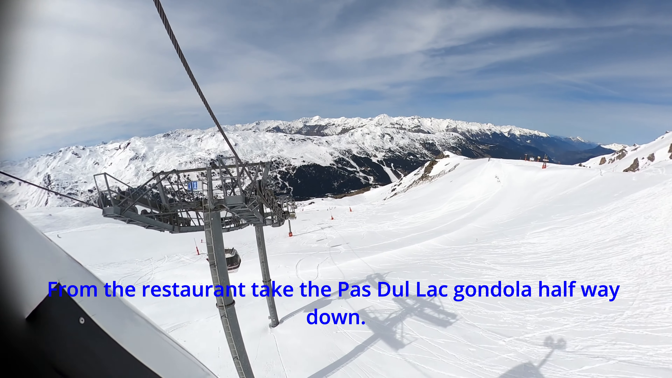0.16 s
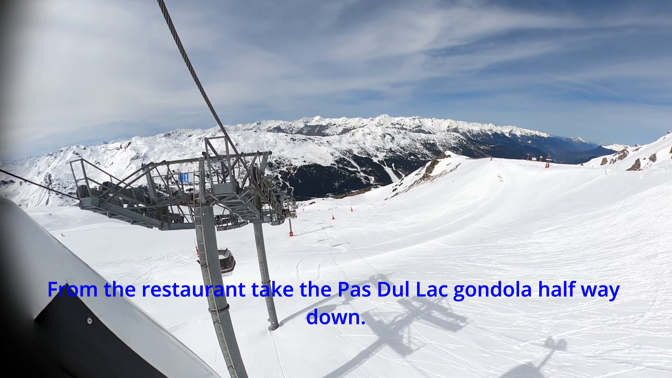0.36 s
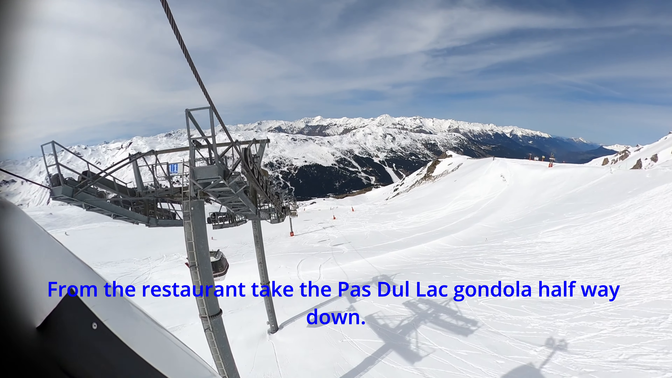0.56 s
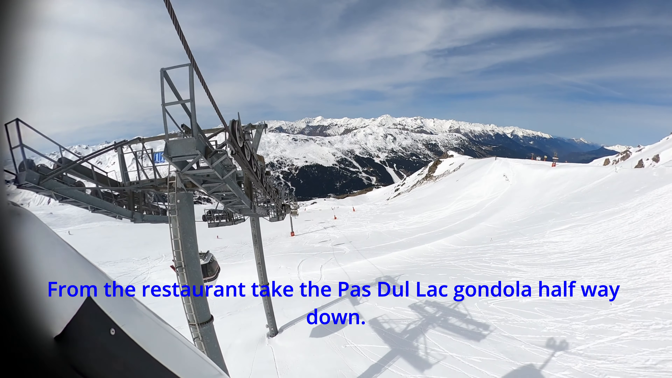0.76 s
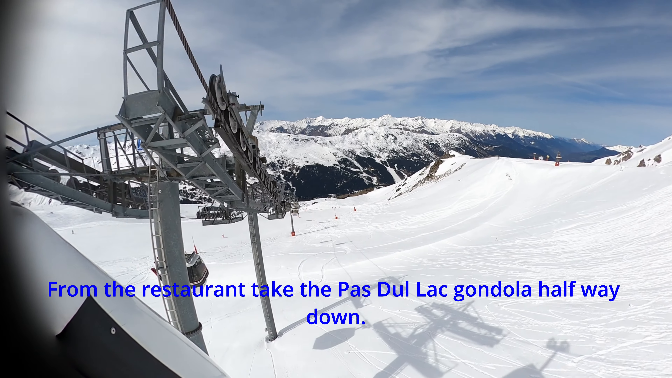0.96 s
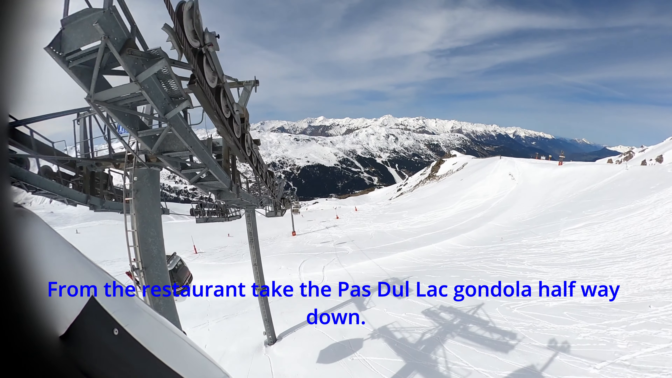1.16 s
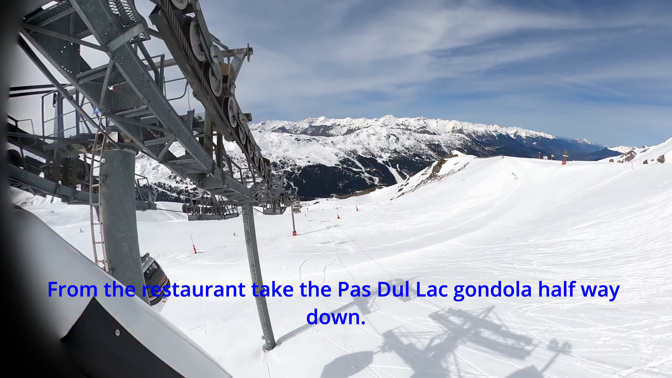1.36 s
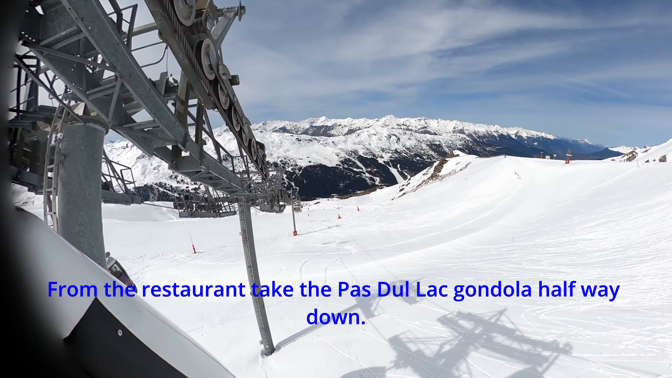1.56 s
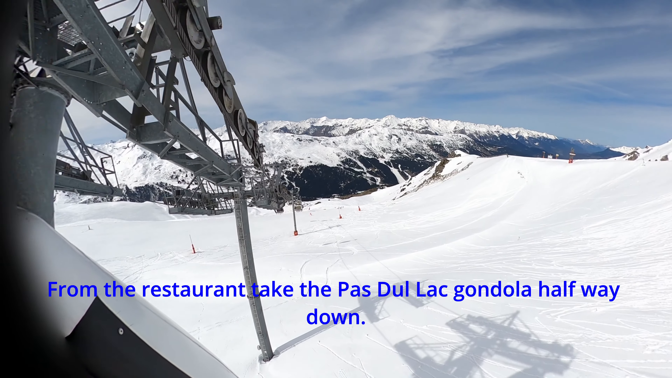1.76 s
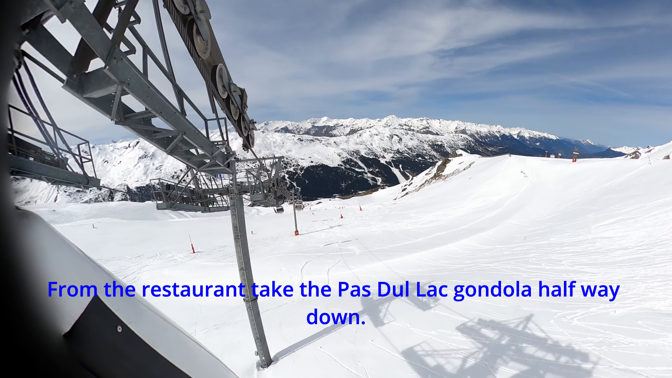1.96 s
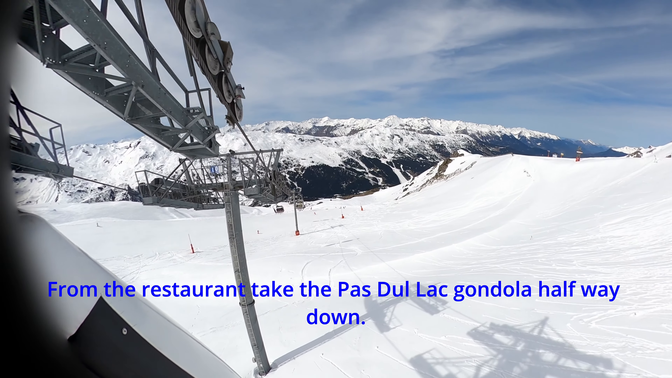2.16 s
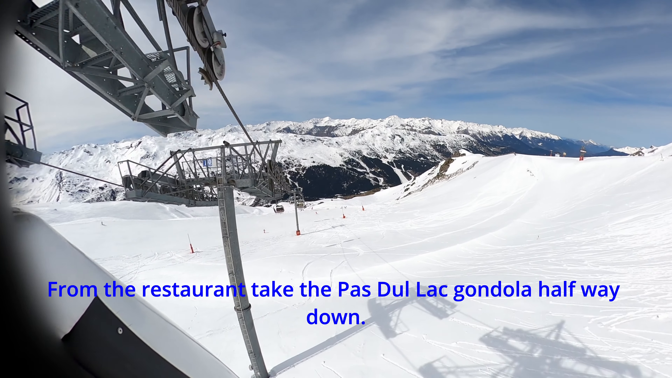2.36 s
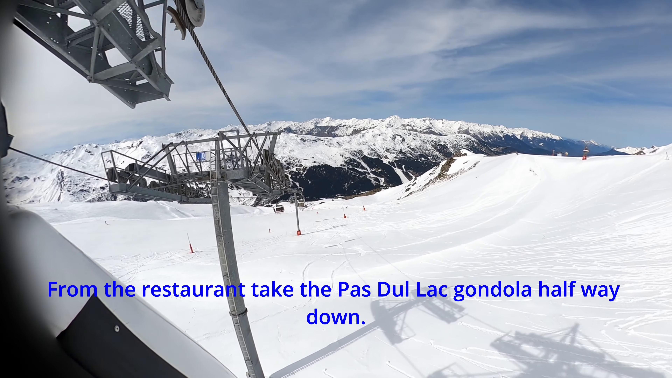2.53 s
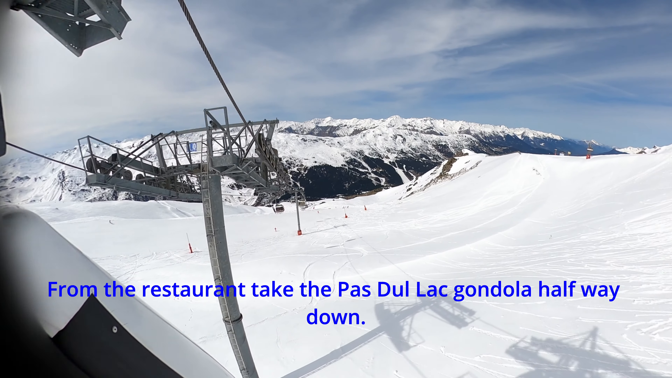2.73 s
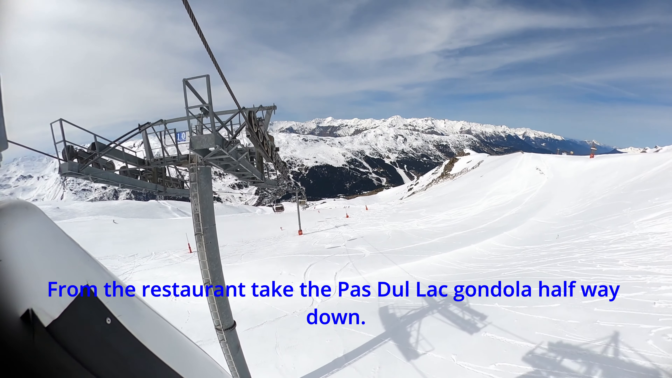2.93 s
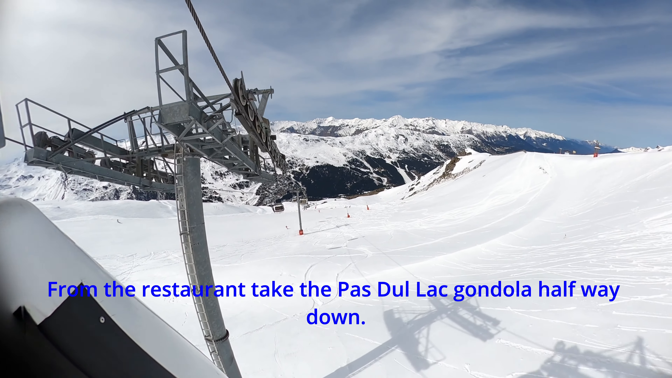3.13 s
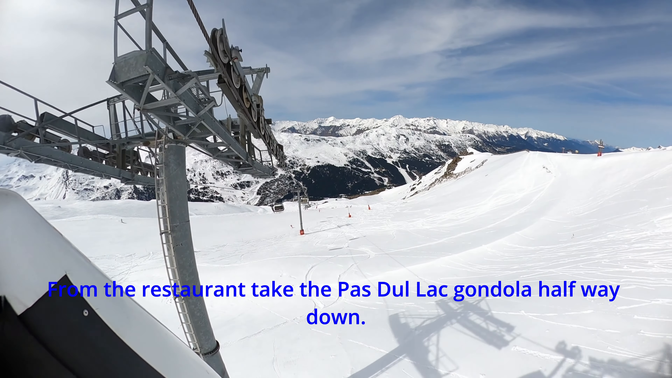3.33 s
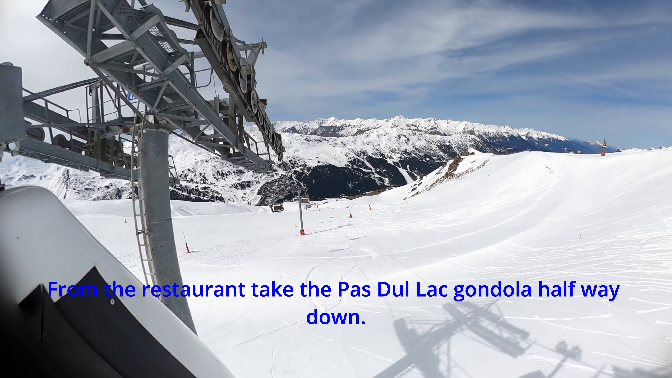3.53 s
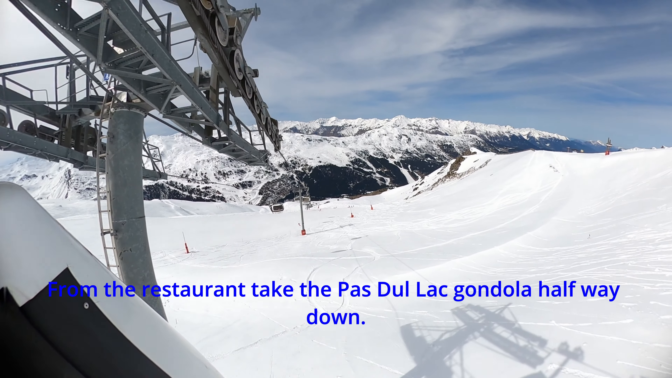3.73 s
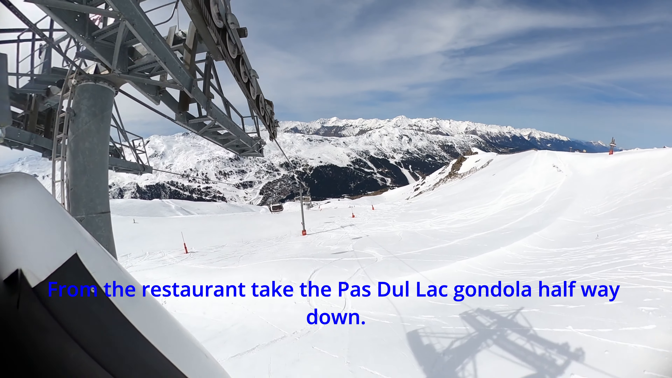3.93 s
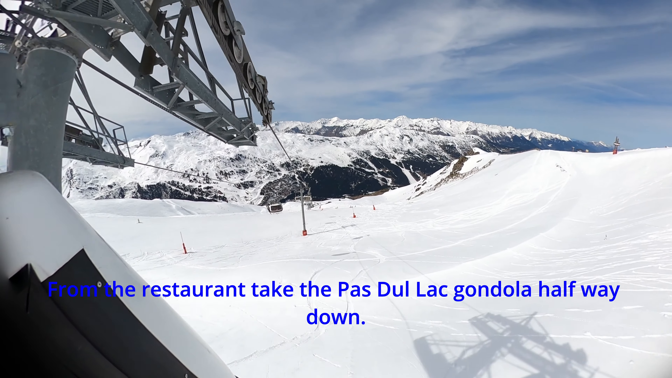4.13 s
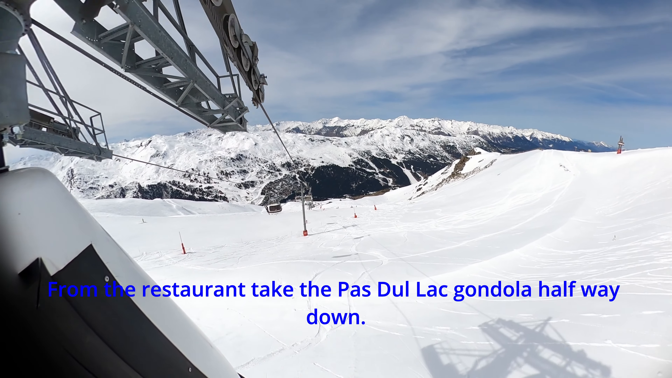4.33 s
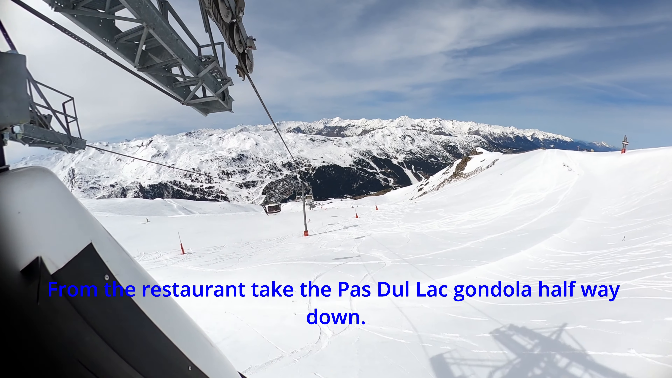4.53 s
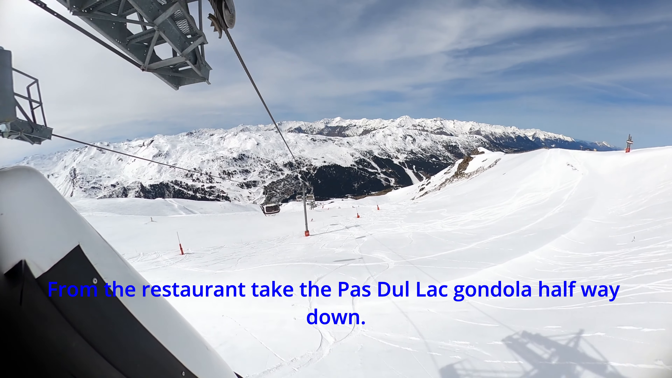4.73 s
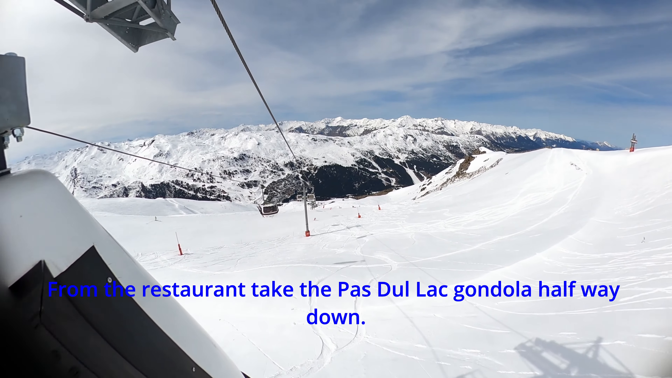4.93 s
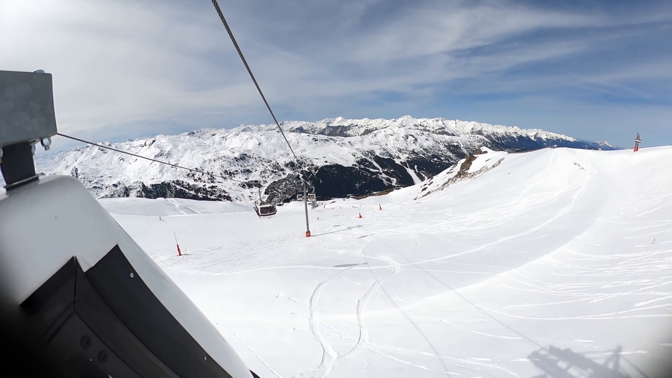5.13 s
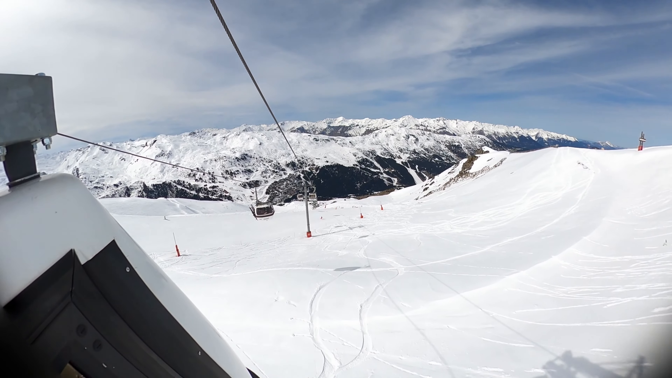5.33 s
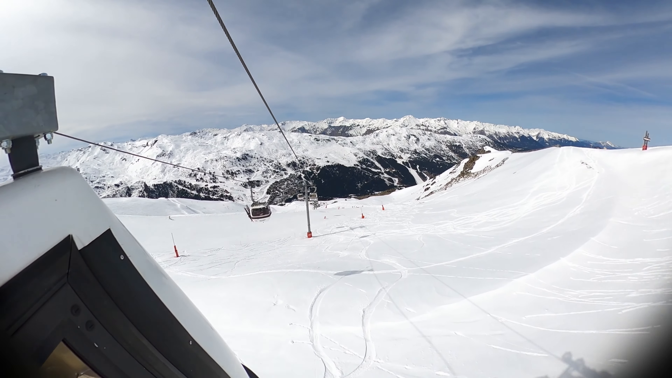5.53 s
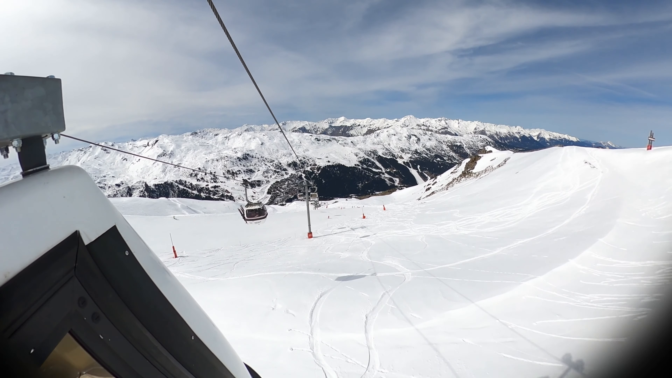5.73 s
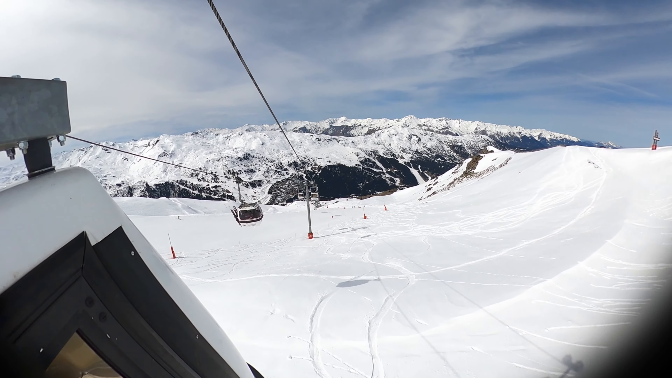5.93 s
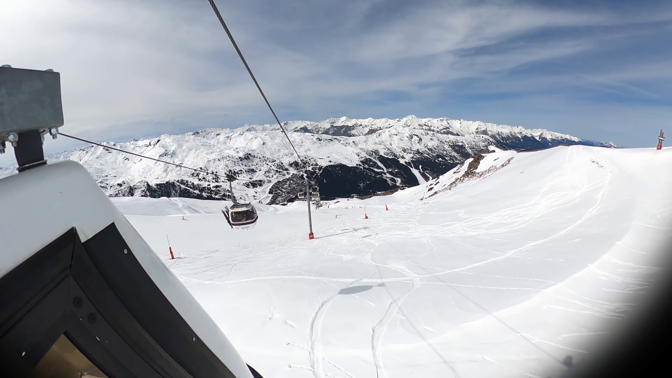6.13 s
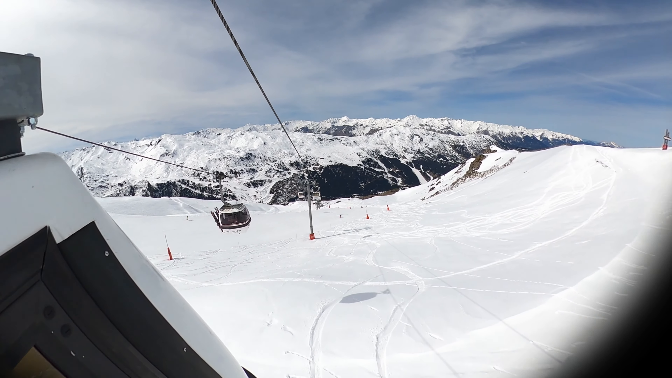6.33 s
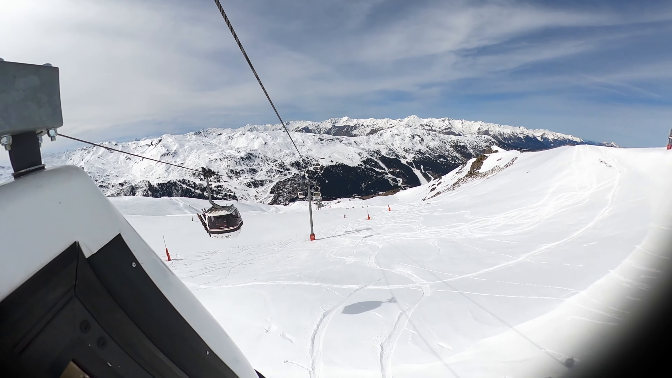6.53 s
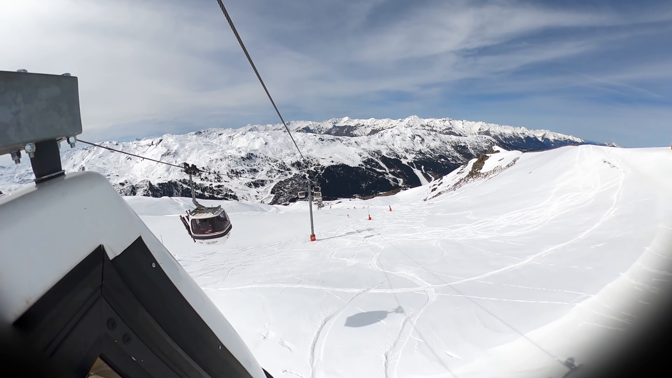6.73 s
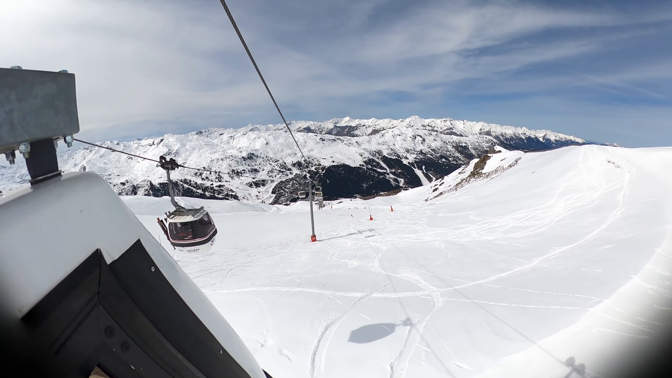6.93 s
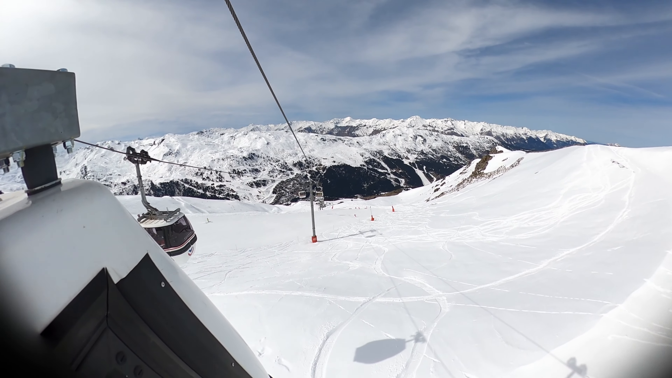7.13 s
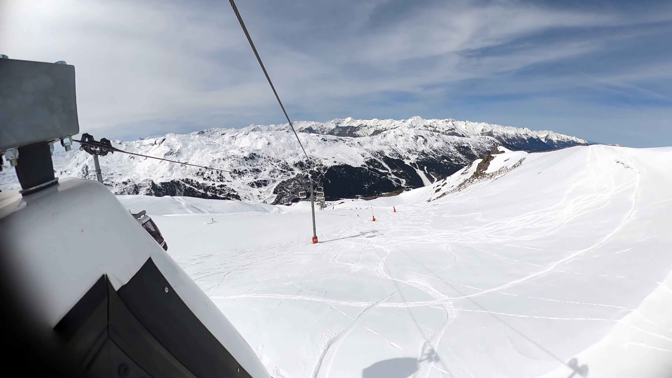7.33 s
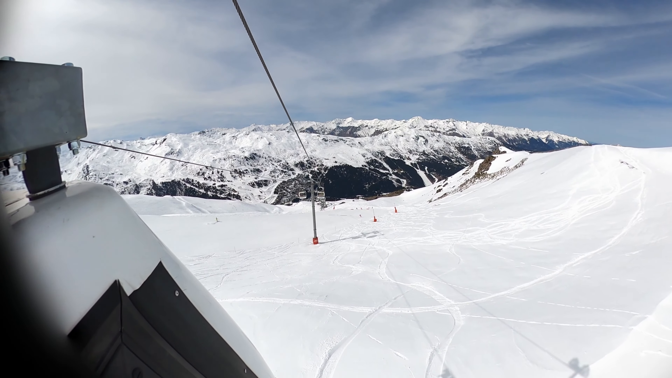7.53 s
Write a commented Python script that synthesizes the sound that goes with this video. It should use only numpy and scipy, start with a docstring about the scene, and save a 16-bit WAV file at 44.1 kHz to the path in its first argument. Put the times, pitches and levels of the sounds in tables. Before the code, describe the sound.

A cable car cabin rumbles along its humming cable, clatters loudly over the wheels of two pylons in a row, then quiets.

```python
"""A deep rumble of wind and cabin body, with a fitting squeaking over it: a cable-car ride, heard
from a small microphone at the window. Two pylons pass in a row. The rope hisses on their wheels as
they come near, then the grip jolts over each wheel and loose steel parts knock and rattle.
Floor and panels boom, the rope hums, the cabin knocks softly, and the ride ends nearly quiet."""
import sys
import numpy as np
from scipy import signal
from scipy.fft import rfft, irfft
from scipy.io import wavfile
from scipy.ndimage import uniform_filter1d

SR = 44100
rng = np.random.default_rng(int(sys.argv[2]) if len(sys.argv) > 2 else 0)


def master_out(mix):
    """Clip the mix to full scale and print it as 16-bit PCM to the path in sys.argv[1]."""
    frames = np.transpose(np.atleast_2d(mix))
    ceiling = np.clip(frames, -1, 1)
    pcm = np.round(ceiling * 32767).astype(np.int16)
    wavfile.write(sys.argv[1], SR, pcm)


N = 334166

# The grip on a pylon's wheels. Each row: start and end in seconds, clatter and specks in dB.
PYLONS = [(1.72, 3.255, -46, -70.5), (4.065, 5.55, -43.5, -66)]
# The grip jolts on a wheel. Each row: start in seconds, clatter and specks in dB, length in seconds.
JOLTS = [(1.697, -43, -73, 0.026), (1.734, -39.5, -66, 0.022), (1.85, -39.5, -63, 0.1),
         (1.937, -38.5, -63, 0.049), (2.002, -43, -76, 0.017), (2.087, -33, -56, 0.037),
         (2.148, -36.5, -55.5, 0.048), (2.197, -35.5, -56, 0.054), (2.339, -36, -57, 0.062),
         (2.405, -41, -61, 0.078), (2.46, -38.5, -73, 0.018), (2.54, -44.5, -70, 0.016),
         (2.583, -35.5, -55, 0.053), (2.669, -36.5, -55, 0.05), (2.714, -35, -58, 0.023),
         (2.817, -43, -64, .01), (2.845, -37.5, -56, 0.028), (2.916, -44.5, -58, 0.041),
         (2.946, -39, -61.5, 0.053), (3.029, -44, -63, 0.013), (3.084, -34, -55, 0.062),
         (3.174, -39, -67, 0.022), (3.201, -38, -62, 0.038), (4.008, -43, -70, .012),
         (4.038, -40.5, -62, 0.027), (4.154, -36, -58, 0.056), (4.217, -37, -60, 0.072),
         (4.272, -42, -69, 0.1), (4.389, -33.5, -52, 0.097), (4.504, -36, -55.5, 0.063),
         (4.63, -56, -72, .02), (4.655, -34.5, -59, 0.025), (4.722, -39.5, -60, 0.069),
         (4.892, -36.5, -56.5, 0.054), (4.974, -38.5, -55, 0.084), (5.017, -38, -60, 0.031),
         (5.09, -52, -82, 0.018), (5.15, -37, -60, 0.045), (5.246, -40.5, -61, 0.038),
         (5.275, -40, -60, 0.051), (5.341, -37.5, -57, 0.034), (5.387, -37, -53.5, 0.059),
         (5.484, -41, -64, 0.08), (5.601, -42.5, -62, .01), (5.647, -43.5, -68, 0.019)]
# Hard blows on grip and hanger. Each row: start in seconds, level in dB, brightness in dB per octave.
BLOWS = [(1.698, -36, -2), (1.711, -35, -8), (1.7444, -37, 0.5), (1.8526, -32, 2), (1.8874, -28, 1.5),
         (1.9694, -32.5, -5), (2.0097, -37, -1), (2.0903, -35, 2), (2.148, -28, -7), (2.204, -36.5, 6),
         (2.354, -30, 2), (2.467, -30, -4), (2.5308, -33, -4), (2.586, -38, 0.5), (2.6204, -30, -3),
         (2.6788, -26.5, -1), (2.7214, -35, 0.5), (2.8479, -33, 0.5), (2.9118, -28.5, -1.5),
         (2.9583, -30, 1), (3.03, -30.5, -1), (3.0877, -36, 6), (3.1094, -31.5, -1), (3.2046, -28, 1),
         (4.013, -40, -2), (4.042, -41, 3), (4.1579, -34, 4.5), (4.2208, -31, 0), (4.273, -29, -5),
         (4.3987, -26, 1.5), (4.4236, -29, 3), (4.5186, -29, 0.5), (4.5374, -27, -2), (4.6605, -29, 0.5),
         (4.7212, -31, -8), (4.7498, -37, -3), (4.8466, -40, 0.5), (4.8947, -35, -1), (4.9203, -28.5, 0.5),
         (4.9803, -33, 4), (5.0299, -37, 0.5), (5.1589, -33, 1), (5.251, -35, 0.5), (5.2773, -29, 2),
         (5.3413, -32, 2), (5.3964, -34, 8), (5.4874, -37.5, -1), (5.5074, -35.5, 6), (5.6027, -49, -2),
         (5.6533, -40, 0.5)]
# Metal ticks on metal. Each row: start in seconds, peak in dB, pitch in Hz.
TICKS = [(1.5736, -45, 5000), (1.686, -37, 5600), (1.7397, -44, 5000), (1.8092, -37, 4000),
         (1.925, -40, 4500), (2.071, -39, 4800), (2.0895, -31.5, 4000), (2.3156, -38, 3700),
         (2.424, -43, 5500), (2.5707, -43, 5000), (2.807, -36, 3940), (3.1145, -23, 3270),
         (3.878, -39.5, 5140), (3.9, -40, 3400), (3.9694, -56, 9000), (3.9933, -39, 5500),
         (4.044, -42, 6500), (4.116, -40, 4970), (4.379, -35, 4300), (4.3963, -38, 3500),
         (4.6173, -38, 4800), (4.9598, -42, 3500), (5.2782, -33, 3400), (5.6050, -40, 4300),
         (5.6526, -50, 3300)]
# Rope on the wheels, louder close to a pylon. Each row: time in seconds, hiss and breathy band in dB.
WHEELS = [(0, -59, -72), (.9, -60, -61), (1.5, -51.5, -55.5), (3.2, -46, -56), (3.4, -54.5, -60),
          (3.65, -55, -57.5), (3.95, -49.5, -57), (5.5, -51, -66), (5.75, -58, -82), (6.12, -61, -93),
          (6.2, -65, -96), (6.6, -68, -88), (7.1, -71.5, -89), (7.35, -64.5, -84), (7.58, -67, -90)]
# How hard the cabin shakes. Each row: time in seconds, then rumble, thud, boom, panels and hum in dB.
RIDE = [(0, -14.5, -31, -35.5, -42.5, -45), (.08, -35, -39, -45.5, -57, -56.5),
        (.45, -33.5, -36, -46, -50, -57), (1.0, -28, -31.5, -44, -56, -55),
        (1.4, -30.5, -35, -47.5, -48.5, -62), (1.65, -24.5, -32.5, -41, -43, -52),
        (1.82, -28, -26, -35, -37.5, -46), (2.2, -20.5, -24, -32.5, -36.5, -51.5),
        (3.25, -27, -33, -32.5, -38, -49.5), (3.4, -20.5, -37.5, -40, -45, -54),
        (3.5, -28.5, -33.5, -43, -49, -55), (3.7, -42, -35, -53, -48, -52),
        (3.97, -29, -38, -46, -46, -44.5), (4.12, -26, -25, -34, -36, -48.5),
        (4.5, -24, -26.5, -29, -37, -44.5), (5.0, -22.5, -29, -33.5, -36.5, -40),
        (5.5, -23.5, -24.5, -32.5, -39, -55), (6.12, -29.5, -30, -52.5, -47.5, -48),
        (6.2, -31.5, -38, -61.5, -50, -63.5), (6.52, -29.5, -36, -53, -52, -52.5),
        (6.7, -35.5, -42.5, -57, -55.5, -63.5), (7.2, -35.5, -53, -59, -53.5, -54.5),
        (7.5, -42, -57, -51.5, -54.5, -56), (7.58, -53, -53, -66, -57, -53)]
# Thumps through the floor. Each row: time in seconds, thud and boom in dB.
THUMPS = [(0.442, -27.5, -56), (.58, -27.5, -36), (0.859, -27, -42), (1.39, -30.5, -42.5), (1.9, -25, -46),
          (2.17, -40, -29), (2.5, -28, -49), (2.64, -32, -25), (2.76, -20.5, -49), (3.132, -18, -29),
          (3.27, -22, -43), (3.8, -31, -61), (4.3, -44, -31), (4.41, -37, -39), (4.68, -36, -46),
          (4.81, -43, -31), (4.94, -20, -31), (5.049, -22, -25), (5.43, -25.5, -29), (5.63, -33, -37),
          (5.94, -27, -35.5), (6.121, -24.5, -38.5), (6.37, -27, -65), (6.51, -27.5, -64), (7.28, -62, -47)]
# Rope strands on the wheels. Each row: time in seconds, rate in Hz, brightness in dB per harmonic.
STRANDS = [(0, 92.27, 0), (3.4, 92.8, 0), (3.9, 93.36, .5), (5.6, 93.26, 0), (6.3, 91.78, 0),
           (7.58, 91.54, 0)]
# The rope's hum. Each row: multiple of the strand rate, level in dB.
HUM_HARMONICS = [(1, 6.5), (2, -1), (3, -5), (4, -4), (5, -2), (6, -5), (7, -9.5), (8, -17.5), (9, -18.5)]
# Soft scuffs in the cabin. Each row: time in seconds, level in dB, length in seconds.
SCUFFS = [(6.0, -60, 0.015), (6.68, -55, 0.032), (6.735, -61.5, 0.033), (7.33, -64, 0.027)]

# Single events. Each row: time in seconds, level in dB.
LOUD_SPECKS = [(1.74, -41), (1.8447, -45), (1.853, -41), (1.8706, -46), (1.8806, -41), (1.9155, -49),
               (2.0887, -38), (2.1166, -48), (2.1495, -49), (2.175, -45), (2.1804, -44), (2.1894, -44),
               (2.2254, -48), (2.3136, -45), (2.3406, -45), (2.3694, -42), (2.4034, -48), (2.4354, -40),
               (2.587, -47), (2.6155, -45), (2.6678, -44), (2.6948, -37), (2.7342, -41), (2.807, -45),
               (2.8379, -48), (2.8534, -45), (2.8614, -41), (2.9108, -46), (2.9277, -45), (2.9602, -42),
               (3.0869, -43), (3.11, -36), (3.1931, -46), (3.243, -44), (4.0422, -42), (4.1589, -39),
               (4.2368, -38), (4.2727, -45), (4.3874, -40), (4.3969, -35), (4.4223, -39), (4.4712, -50),
               (4.5004, -47), (4.5106, -46), (4.5326, -42), (4.6513, -46), (4.6794, -50), (4.7366, -45),
               (4.8324, -52), (4.8948, -46), (4.9207, -47), (4.9766, -38), (5.0005, -44), (5.0285, -39),
               (5.0883, -52), (5.1497, -45), (5.2709, -48), (5.3283, -44), (5.3527, -51), (5.3946, -42),
               (5.4186, -36), (5.5064, -38), (5.6027, -50), (5.6516, -55)]  # the smallest loose parts touch
HEAVES = [(.21, -20.5), (0.499, -19), (.6, -33.5), (.93, -41), (1.26, -44), (1.37, -24), (1.67, -19),
          (2.02, -15), (2.24, -24), (2.509, -13), (2.76, -14), (3.04, -14.5), (3.23, -12), (3.35, -29),
          (3.93, -33), (4.31, -17), (4.72, -42), (4.82, -13.5), (5.05, -32), (5.32, -18), (5.53, -18),
          (5.97, -16), (6.5, -23), (7.47, -34.5)]  # the deep rumble swells
SLIPS = [(0.0044, -54), (.016, -45.5), (0.0328, -62), (.047, -66), (0.1116, -54), (0.1466, -51),
         (0.191, -49.5), (0.2409, -45), (.264, -60), (0.2793, -59), (.294, -61), (0.3142, -46.5),
         (0.3244, -57), (0.3656, -50), (0.3764, -56), (0.3995, -59), (.408, -57), (0.417, -54), (.432, -56),
         (.441, -55), (0.4504, -49.5), (.461, -58), (0.4714, -56), (0.4938, -54), (0.5282, -62),
         (0.5494, -63), (1.4641, -47), (1.4794, -55), (1.5, -44), (1.5194, -59)]  # the fitting slips
KNOCKS = [(.216, -49), (.298, -61), (.335, -46.5), (.575, -49), (6.755, -48), (6.945, -52), (7.02, -49)]  # hollow knocks in the cabin

# Ringing modes. Each row: pitch in Hz, width in Hz, gain in dB.
STEEL_MODES = [(1100, 70, 2.5), (1300, 50, 3), (1532, 55, 8), (1840, 35, 3), (2029, 18, 6), (2156, 45, 2),
               (2320, 45, 2), (2613, 55, 5.5), (2817, 40, 3), (3260, 80, 5), (3580, 60, 3), (3845, 60, 3),
               (4290, 50, 3), (4471, 60, 3), (4896, 50, 4), (5075, 50, 4), (5550, 45, 5), (5990, 50, 4),
               (6360, 50, 4), (7110, 45, 6), (7609, 35, 5)]  # grip and hanger
CABIN_MODES = [(325, 31, 0.5), (412, 23, 5.5), (622, 24, 2.5), (815, 12, 7), (1075, 15, 7)]  # panels and cabin air
KNOCK_MODES = [(844, 38, 0.73), (970, 38, -1.7)]
# The fitting's modes. Each row: pitch in Hz, level in dB, seconds to die by 60 dB.
SQUEAK_MODES = [(3075, 0, .05), (3130, 1, 0.03)]

# Each sound's tone colour at the microphone. Each row: frequency in Hz, spectral density in dB.
CLATTER_SPECTRUM = [(250, -14), (450, 6.5), (750, 3), (1100, 5), (1500, 1.5), (2200, -2), (2600, -2.5),
                    (3300, -3.5), (5000, -10), (7000, -22), (10000, -39), (16000, -59)]
GRIT_SPECTRUM = [(4000, -27), (7000, -3), (8500, -8.5), (10000, -12.5), (11300, -13), (12200, -1),
                 (13200, -5.5), (14500, -8), (16000, -24)]
HISS_SPECTRUM = [(500, -6.5), (900, 0), (1500, -2), (2400, -6), (3300, -11.5), (4500, -14), (7000, -23),
                 (10000, -36.5), (15500, -69)]
SIZZLE_SPECTRUM = [(5000, -45.5), (9000, -17.5), (10500, -12.5), (12400, 0), (14000, -11.5), (16000, -21.5)]
WIND_SPECTRUM = [(8, -26), (15, 3.5), (24, 6.5), (33, 10), (42, 12), (52, 1), (62, -1), (90, -19.5),
                 (150, -25), (600, -120)]
THUD_SPECTRUM = [(40, -17), (65, 2.5), (90, -2), (125, 0), (150, -16.5), (200, -33), (500, -63.5),
                 (1500, -120)]
BOOM_SPECTRUM = [(100, -31), (150, 1), (185, 0.5), (230, -7.5), (320, -14), (1000, -120)]
PANEL_SPECTRUM = [(150, -39), (260, -2), (350, -3), (480, -5.5), (650, -9), (800, -15), (1500, -25.5),
                  (3000, -66.5), (8000, -120)]
SCUFF_SPECTRUM = [(400, -15), (850, -2.5), (1500, -3), (1900, -9), (2300, -4), (2800, -13), (4600, -16),
                  (7000, -26), (12000, -54)]
AIR_SPECTRUM = [(300, -5), (700, -6), (1100, -4), (1700, -5.5), (2600, -18.5), (4500, -27), (7000, -26.5),
                (9000, -43.5), (15500, -63)]

THUMP_S = 0.047


def rattle():
    """Dense impacts ring in grip and hanger; small knocks ping one mode each, hard blows ring all."""
    force = shaking(column=1, hold_share=0.8, t60=0.19)
    impacts = from_db(-2.5) * rng.standard_normal(N) + from_db(-7) * contacts(per_s=600, spread_db=0.7)
    steel = ringing(force * from_db(0.4 * drift(55)) * impacts, STEEL_MODES, wander_db=4.5)
    for hz, width, lift_db in STEEL_MODES:
        ping_gain = from_db(lift_db - 26) * np.sqrt(SR / width / len(STEEL_MODES))
        steel += ping_gain * resonance(force * contacts(per_s=90, spread_db=2.4), hz, 3.1 * width)
    return colour(steel + blows(), CLATTER_SPECTRUM)


def shaking(column, hold_share, t60):
    """The grip shakes on the wheels, harder at each jolt. Column 1 gives clatter, column 2 specks."""
    t = np.arange(N) / SR
    roll_on_s, roll_off_s, rise_s = 0.05, 0.011, 0.0025
    rolling, jolt_power = np.zeros((2, N))
    for start, end, *levels_db in PYLONS:
        ramp = np.minimum((t - start) / roll_on_s, (end - t) / roll_off_s) + 1
        rolling += from_db(levels_db[column - 1]) * np.clip(ramp, 0, 1)
    for start, *levels_db, length_s in JOLTS:
        age = np.maximum(t - start, 0)
        rise = 1 - np.exp(-age / rise_s)
        decay = from_db(-60 * np.maximum(age - hold_share * length_s, 0) / t60)
        jolt_power += (from_db(levels_db[column - 1]) * rise * decay) ** 2
    return np.sqrt(rolling ** 2 + jolt_power)


def blows():
    """A crack, then every mode of the steel rings with a strength and a slight detuning of its own."""
    mode_db, spread_db, crack_db, rise_s, detune = -22, 5, -5, 0.0008, 0.01
    out, t = np.zeros(N + 4096), np.arange(4096) / SR
    hz, width, lift_db = np.transpose(STEEL_MODES)[:, :, None]
    envelopes = np.exp(-np.pi * width * t) * (1 - np.exp(-t / rise_s))
    for start, db, bright_db in BLOWS:
        strength, shift = rng.standard_normal((2, len(STEEL_MODES), 1))
        tilt_db = bright_db * np.log2(hz / hz[2])
        gains = from_db(db + mode_db + lift_db + spread_db * strength + tilt_db)
        tones = np.sin(2 * np.pi * hz * (1 + detune * shift) * t)
        at = int(start * SR)
        out[at:at + len(t)] += np.sum(gains * envelopes * tones, axis=0)
    return out[:N] + from_db(crack_db) * clicks(np.array(BLOWS)[:, :2])


def specks():
    """The smallest parts touch seldom: bright grit under each jolt, and separate specks above it."""
    thrown = shaking(column=2, hold_share=0.62, t60=0.14)
    grit = colour(thrown * from_db(3.15 * drift(40) + 0.5) * rng.standard_normal(N), GRIT_SPECTRUM)
    speck = signal.unit_impulse(256)
    for _ in range(3):
        speck = resonance(speck, hz=12360, width_hz=1900)
    touches = thrown * from_db(-15.5) * contacts(per_s=300, spread_db=5.9) + clicks(LOUD_SPECKS)
    return grit + np.convolve(touches, speck / np.abs(speck).max())[:N]


def ticks():
    """Metal ticks on metal: each a thin, sharp spray of noise in a broad band around its own pitch."""
    out, t = np.zeros(N + 1024), np.arange(1024) / SR
    t60 = 0.011
    for start, db, hz in TICKS:
        burst = from_db(-60 * t / t60) * rng.standard_normal(len(t))
        spray = steep_band(burst, hz, width_hz=0.6 * hz)
        at = int(start * SR)
        out[at:at + len(t)] += from_db(db) * spray / np.abs(spray).max()
    return out[:N]


def wheels():
    """The rope hisses on the wheels; the top end carries only a short way, so it grows faster close up."""
    near_db, breathy_db = in_time(WHEELS)
    noise = rng.standard_normal((3, N))
    hiss = from_db(near_db + 1.5 * drift(25)) * colour(noise[0], HISS_SPECTRUM)
    sizzle = from_db(-84 + 1.74 * (near_db + 54.5)) * colour(noise[1], SIZZLE_SPECTRUM)
    breath = from_db(breathy_db) * rms_one(steep_band(noise[2], hz=3160, width_hz=1300))
    return hiss + sizzle + breath


def rumble():
    """Wind and the swaying body rumble deep down; thumps come up through the floor."""
    deep_db, thud_db = in_time(RIDE)[:2]
    noise = rng.standard_normal((2, N))
    deep_gain = bumps(deep_db + 3.5 * drift(7.8), HEAVES, length_s=0.041)
    thud_gain = bumps(thud_db + 2.4 * drift(3.06), np.array(THUMPS)[:, :2], THUMP_S)
    deep = evened(colour(noise[0], WIND_SPECTRUM), window_s=0.16)
    thud = evened(colour(noise[1], THUD_SPECTRUM), window_s=0.051)
    return deep_gain * deep + thud_gain * thud


def cabin():
    """Around the microphone the floor booms with the thumps and the shaken panels drone."""
    boom_db, panel_db = in_time(RIDE)[2:4]
    noise = rng.standard_normal((2, N))
    boom = bumps(boom_db, np.array(THUMPS)[:, [0, 2]], THUMP_S) * colour(noise[0], BOOM_SPECTRUM)
    panel_gain = from_db(panel_db + 2 * drift(31))
    panels = ringing(colour(noise[1], PANEL_SPECTRUM), CABIN_MODES, wander_db=-0.5)
    return boom + panel_gain * rms_one(panels)


def rope_hum():
    """Strands running on the wheels hum at multiples of their rate, wavering in strength and phase."""
    waver_db, waver_rad = 3, 1.2
    gain = from_db(in_time(RIDE)[4] + 1.5 * drift(3))
    rate_hz, bright_db = in_time(STRANDS)
    phase = 2 * np.pi * np.cumsum(rate_hz) / SR
    hum = np.zeros(N)
    for k, db in HUM_HARMONICS:
        strength = from_db(db + bright_db * k + waver_db * drift(5.5))
        hum += strength * np.sin(k * phase + waver_rad * drift(7.9))
    return gain * hum


def squeak():
    """Each slip of the fitting is a soft push, a few ms long, that rings two close modes."""
    t = np.arange(N) / SR
    soft = np.exp(-1 / (0.0012 * SR))
    push = signal.lfilter([(1 - soft) ** 2], [1, -2 * soft, soft ** 2], clicks(SLIPS))
    out = np.zeros(N)
    for hz, db, t60 in SQUEAK_MODES:
        envelope = signal.lfilter([1], [1, -from_db(-60 / (t60 * SR))], push)
        phase = 2 * np.pi * hz * t + 0.62 * drift(21)  # the pitch wavers
        out += from_db(db) * envelope * np.sin(phase)
    return out


def knocks():
    """Small hollow knocks in the cabin: a softened click rings two dull modes."""
    out = np.zeros(N)
    for hz, width, db in KNOCK_MODES:
        softened = resonance(clicks(KNOCKS), hz, width_hz=900)
        out += from_db(db) * SR / (2 * np.pi * width) * resonance(softened, hz, width)
    return out


def scuffs():
    """Soft scuffs in the cabin, late in the ride: short dull puffs of noise."""
    t = np.arange(N) / SR
    puffs = sum(from_db(db) * np.exp(-0.5 * ((t - s) / (length / 2)) ** 2) for s, db, length in SCUFFS)
    return puffs * colour(rng.standard_normal(N), SCUFF_SPECTRUM)


def air():
    """A faint, wavering bed of air at the window."""
    return from_db(-63.5 + 1.4 * drift(11)) * colour(rng.standard_normal(N), AIR_SPECTRUM)


def from_db(db):
    """Decibels to gain."""
    return 10 ** (np.asarray(db) / 20)


def rms_one(x):
    """Scale to rms 1."""
    return x / np.sqrt(np.mean(x ** 2) + 1e-30)


def in_time(rows):
    """The columns of a timed table, interpolated to every sample."""
    seconds, *columns = np.transpose(rows)
    return [np.interp(np.arange(N) / SR, seconds, column) for column in columns]


def drift(rate_hz):
    """Smooth random wander of rms 1."""
    pole = np.exp(-80 * np.pi * rate_hz / SR)  # one step every 40 samples
    slow = signal.lfilter([1], [1, -2 * pole, pole * pole], rng.standard_normal(N // 40 + 2002))[2000:]
    return np.interp(np.arange(N) / 40, np.arange(len(slow)), rms_one(slow))


def bumps(base_db, rows, length_s):
    """A gain curve: the base level with a smooth swell added in power at each (seconds, dB) row."""
    t = np.arange(N) / SR
    swells = sum(from_db(db) ** 2 * np.exp(-((t - s) / (length_s / 2)) ** 2) for s, db in rows)
    return np.sqrt(from_db(base_db) ** 2 + swells)


def clicks(rows):
    """One impulse for each (seconds, dB) row."""
    out = np.zeros(N)
    for start, db in rows:
        out[int(start * SR)] = from_db(db)
    return out


def contacts(per_s, spread_db):
    """Random small impacts of uneven size, at rms 1."""
    sizes = from_db(spread_db * np.minimum(rng.exponential(1, N), 3))
    signs = rng.choice([-1, 1], N)
    return rms_one(sizes * signs * (rng.random(N) < per_s / SR))


def colour(x, spectrum):
    """Minimum-phase filter with the given spectrum and unit power gain."""
    hz, db = np.transpose(spectrum)
    grid_hz = np.maximum(np.arange(8193) * SR / 16384, 1)
    cepstrum = irfft(np.interp(np.log(grid_hz), np.log(hz), db) * np.log(10) / 20)
    cepstrum[1:8192] *= 2  # folding the cepstrum makes the filter causal
    cepstrum[8193:] = 0
    response = irfft(np.exp(rfft(cepstrum)))
    return signal.fftconvolve(x, response / np.sqrt(np.sum(response ** 2)))[:N]


def resonance(x, hz, width_hz):
    """Band-pass with gain 1 at its peak."""
    r = np.exp(-np.pi * width_hz / SR)
    feedback = [1, -2 * r * np.cos(2 * np.pi * hz / SR), r * r]
    return signal.lfilter([(1 - r * r) / 2, 0, (r * r - 1) / 2], feedback, x + 1e-18)


def steep_band(x, hz, width_hz):
    """The same resonance twice, for steeper flanks."""
    return resonance(resonance(x, hz, width_hz), hz, width_hz)


def ringing(x, modes, wander_db):
    """Lift modes out of a broad sound; how hard each one is driven wanders."""
    return x + sum((from_db(lift_db) - 1) * resonance(x * from_db(wander_db * drift(10)), hz, width)
                   for hz, width, lift_db in modes)


def evened(x, window_s):
    """Take part of the chance swells out of a narrow noise; the result has rms 1."""
    local_level = np.sqrt(uniform_filter1d(x ** 2, int(window_s * SR)) + 0.035)
    return rms_one(x / local_level ** 0.9)


def scene():
    """Everything that reaches the window, in mono."""
    ride = air() + rumble() + cabin() + rope_hum() + wheels()
    loose_steel = rattle() + specks() + ticks()
    return (ride + loose_steel + squeak() + scuffs() + knocks())[None]


def record(dry):
    """The small microphone: peaks are rounded and the very top is cut."""
    cutoff_hz = 15920
    rounded = 0.52 * np.tanh(dry / 0.67)
    return signal.sosfilt(signal.cheby2(24, 60, cutoff_hz, fs=SR, output="sos"), rounded)


dry = scene()
out = record(dry)
master_out(out)
```